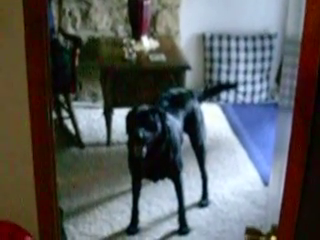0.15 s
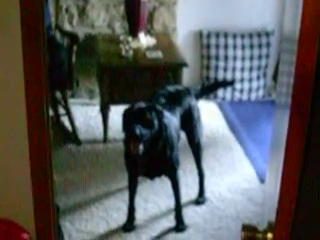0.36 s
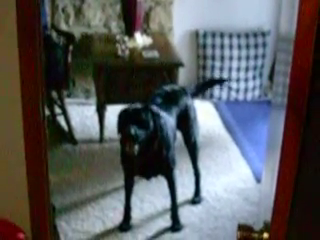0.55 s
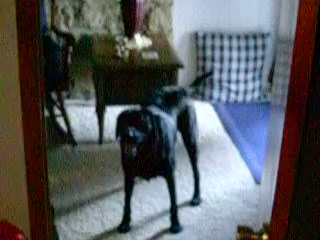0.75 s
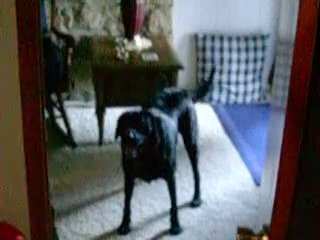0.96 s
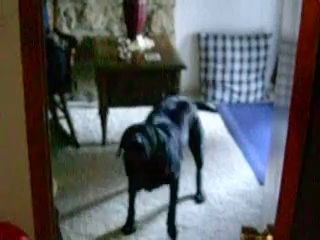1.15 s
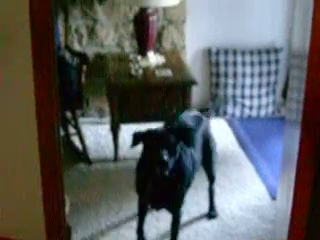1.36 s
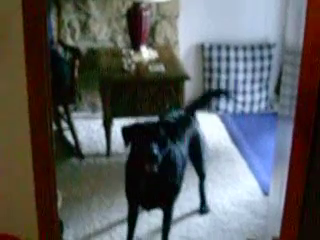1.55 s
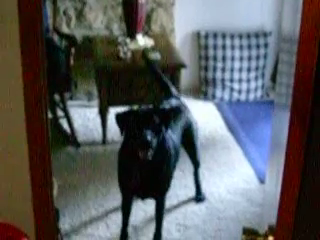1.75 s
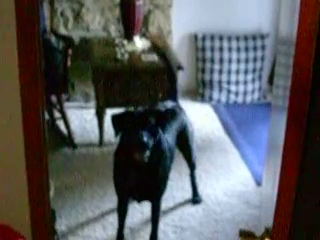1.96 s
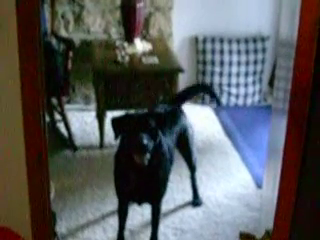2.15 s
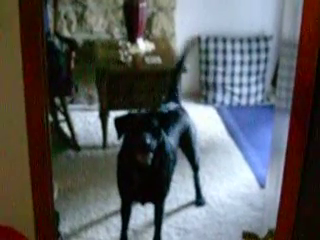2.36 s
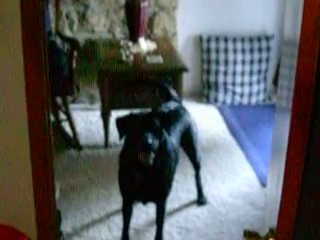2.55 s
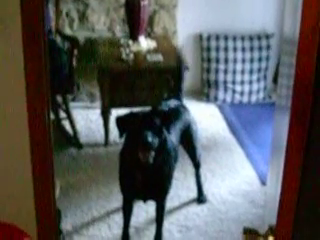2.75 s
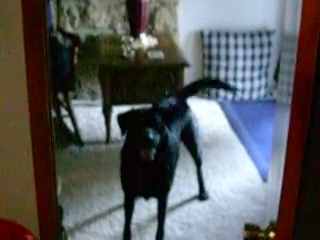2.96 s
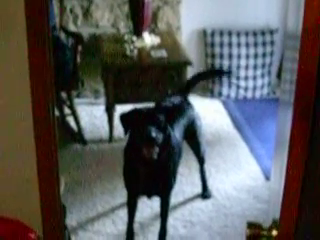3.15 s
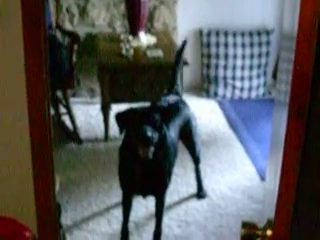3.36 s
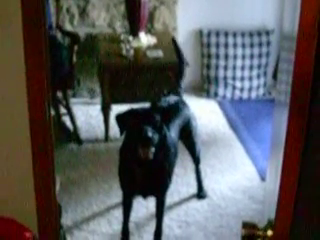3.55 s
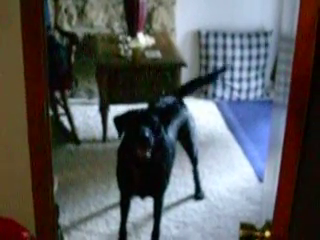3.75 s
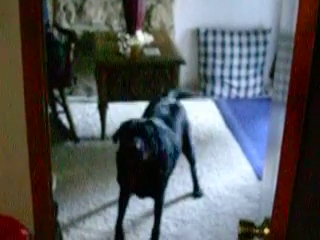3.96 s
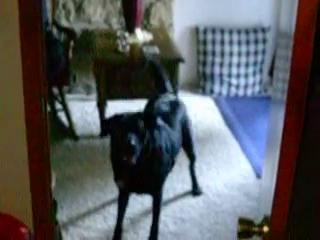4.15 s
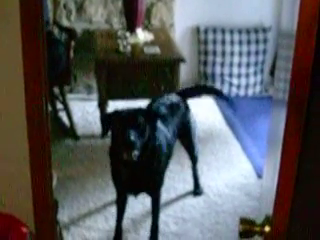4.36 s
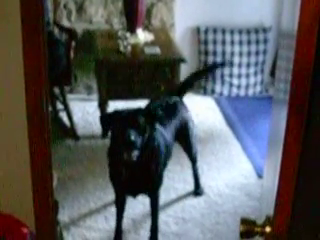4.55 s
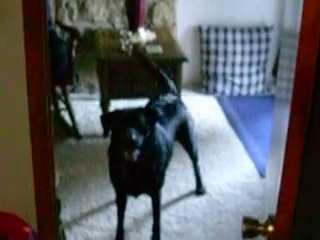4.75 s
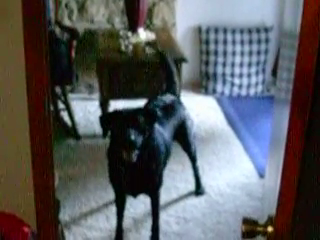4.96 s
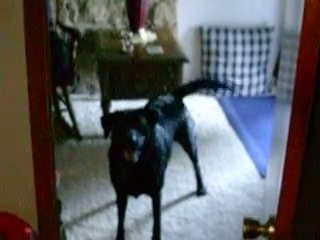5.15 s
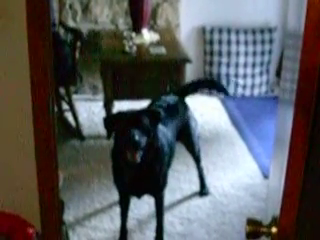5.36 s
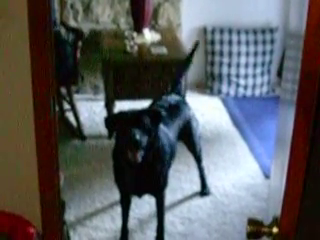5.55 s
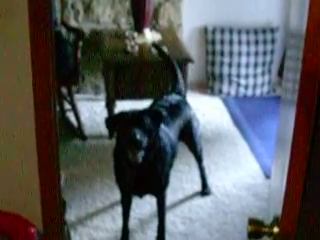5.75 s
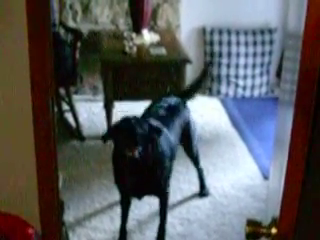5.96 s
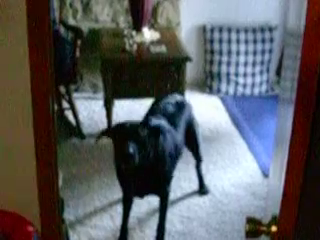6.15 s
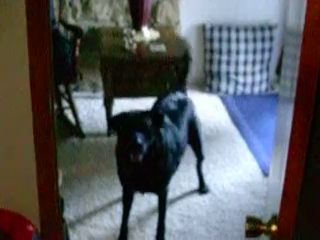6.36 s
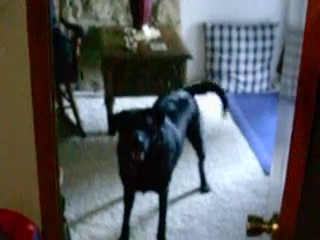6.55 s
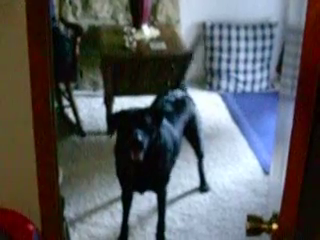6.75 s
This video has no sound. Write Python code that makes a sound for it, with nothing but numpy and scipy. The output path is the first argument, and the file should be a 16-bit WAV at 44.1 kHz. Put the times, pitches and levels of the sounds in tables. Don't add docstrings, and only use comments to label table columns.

```python
import sys
import numpy as np
from scipy import signal
from scipy.fft import rfft, irfft, next_fast_len
from scipy.io import wavfile
from scipy.ndimage import uniform_filter1d

SR = 44100
rng = np.random.default_rng(int(sys.argv[2]) if len(sys.argv) > 2 else 0)


def rack_gain(trim_db):
    fader = np.asarray(trim_db, float)
    return 10 ** (fader / 20)


def inscribe(sig):
    pcm = np.round(np.clip(np.atleast_2d(sig).T, -1, 1) * 32767)
    wavfile.write(sys.argv[1], SR, pcm.astype(np.int16))


N = 298865


def rms_one(x):
    return x / np.sqrt(np.mean(x ** 2) + 1e-20)


def drift(rate_hz, size):
    r = np.exp(-2 * np.pi * rate_hz / SR)
    wander = signal.lfilter([1], [1, -2 * r, r * r], rng.standard_normal(size + 4000))
    return rms_one(wander[4000:])


def resonance_filter(hz, width_hz):
    r = np.exp(-np.pi * width_hz / SR)
    return [(1 - r * r) / 2, 0, (r * r - 1) / 2], [1, -2 * r * np.cos(2 * np.pi * hz / SR), r * r]


def resonance(x, hz, width_hz):
    return signal.lfilter(*resonance_filter(hz, width_hz), x)


# (start [s], rise time [s], jaw starts closing after [s], level [dB], pitch sag [Hz/s])
BARK_TIMES = [
    (1.028, .024, .115, -4.5, 2000),
    (3.809, .013, .105, -4, 3036),
    (5.909, .013, .11, -3.5, 2906),
]


def barks():
    return sum(bark(*row) for row in BARK_TIMES)


BARK_S = .23
FUNDAMENTAL_DB = -17.5
JAW_DB = -6


def bark(start, *gesture, jitter=.028, uneven_db=6.0):
    first, size = int(start * SR), int(BARK_S * SR)
    pitch, level_db, hoarse, open_db, jaw_hz = bark_shape(np.arange(size) / SR, *gesture)
    hoarse = np.clip(hoarse, 0, 1)

    phase = 2 * np.pi * np.cumsum(pitch * (1 + jitter * drift(66.2, size))) / SR
    pulses = rms_one(sum(np.cos(k * phase) for k in range(1, 9)))
    pulses = pulses * rack_gain(uneven_db * hoarse * drift(130, size))
    breath = signal.lfilter([.4], [1, -.6], rng.standard_normal(size))
    rasp = rms_one(breath * (1 + 0.35 * np.cos(phase)))
    folds = np.sqrt(1 - hoarse) * pulses + np.sqrt(hoarse) * 2.0 * rasp

    voice = jaw(jaw(folds + 1.9 * rasp, jaw_hz * 1.03), jaw_hz * .97)
    voice *= rack_gain(JAW_DB + 6.0 * np.log2(jaw_hz / 650) + 3.5 * drift(50, size))
    voice = voice + rack_gain(FUNDAMENTAL_DB + 5.3 * drift(53, size)) * np.cos(phase)
    voice = voice + throat(folds, rasp, open_db)
    voice = signal.sosfilt(signal.butter(4, 270, "high", fs=SR, output="sos"), voice)
    voice /= np.sqrt(uniform_filter1d(voice ** 2, size=900) + 1e-9)

    out = np.zeros(N)
    out[first:first + size] = voice * rack_gain(level_db) * signal.windows.tukey(size, .05)
    return out


ONSET_DEPTH_DB, ONSET_CURVE, SWELL_DB_PER_S, SWELL_LAG_S = 29.5, 1.6, 69, .055
FADE_LAG_S, FADE_S, FADE_DB = .012, 0.077, 38
START_HZ, TOP_HZ, LOWEST_HZ = 344.25, 581.2, 347
GLIDE_LAG_S, GLIDE_RISES, GLIDE_S = .016, 1.2, .02
JAW_REST_HZ, JAW_DROP_HZ, JAW_DROP_S, JAW_OVER_PITCH = 579, 210, .045, 1.03
OPEN_DB, OPEN_DB_PER_OCTAVE = 0, 6.0
HOARSE_EDGE, HOARSE_PEAK, HOARSE_S = .2, .22, .05


def bark_shape(t, rise_s, close_s, level_db, sag_hz_per_s):
    spent = np.maximum(t - close_s - FADE_LAG_S, 0) / FADE_S
    onset = ONSET_DEPTH_DB * np.exp(-(t / rise_s) ** ONSET_CURVE)
    swell = SWELL_DB_PER_S * np.maximum(t - SWELL_LAG_S, 0)
    level = level_db - onset + swell - FADE_DB * spent ** 1.8

    tight = .5 + .5 * np.tanh((t - GLIDE_LAG_S - GLIDE_RISES * rise_s) / GLIDE_S)
    sagging = np.maximum(TOP_HZ - sag_hz_per_s * (t - close_s), LOWEST_HZ)
    pitch = np.minimum(START_HZ + (TOP_HZ - START_HZ) * tight, sagging)

    settling = JAW_REST_HZ + JAW_DROP_HZ * np.exp(-t / JAW_DROP_S)
    jaw_hz = np.minimum(settling, JAW_OVER_PITCH * sagging)
    open_db = OPEN_DB + OPEN_DB_PER_OCTAVE * np.log2(jaw_hz / TOP_HZ)
    hoarse = HOARSE_EDGE + HOARSE_PEAK * np.exp(-((t - close_s) / HOARSE_S) ** 2)
    return pitch, level, hoarse, open_db, jaw_hz


JAW_WIDTH_HZ = 150


def jaw(x, centre_hz, size=64):
    out, state = np.zeros(len(x)), np.zeros(2)
    for i in range(0, len(x), size):
        mouth = resonance_filter(centre_hz[i], JAW_WIDTH_HZ)
        out[i:i + size], state = signal.lfilter(*mouth, x[i:i + size], zi=state)
    return out


# (frequency [Hz], width [Hz], level [dB])
THROAT_RESONANCES = [(448, 91, -15.5), (800, 190, -4.5), (1045, 247, 0.5), (1440, 220, -6.5),
                     (1646, 250, -9), (2074.3, 120, -10.5), (2275, 87, -19), (3233, 220, -36.5)]


def throat(folds, rasp, open_db):
    voice = 0
    for k, (hz, width, top_db) in enumerate(THROAT_RESONANCES):
        tilt = rack_gain(open_db * np.log2(hz / 700))
        airy = 0.33 * (hz / 2000) ** 2 * rasp
        ring = resonance(resonance(folds + airy, hz, width * 1.86), hz, width * 1.86)
        voice = voice + (-1) ** k * rack_gain(top_db) * tilt * ring
    return voice


# (time [s], length [s], level [dB], centre [Hz])
BREATHS = [
    (1.018, 0.016, -36.5, 1173),
    (1.902, .12, -53, 1280),
    (3.703, .12, -50, 960),
    (4.414, .1, -51, 1105),
    (5.901, 0.022, -41, 942),
    (3.804, 0.013, -46, 1092),
    (6.296, 0.16, -57, 896.4),
]


def pants():
    t, out = np.arange(N) / SR, np.zeros(N)
    for s, length, level_db, hz in BREATHS:
        near = slice(int((s - 2 * length) * SR), int((s + 2 * length) * SR))
        air = rng.standard_normal(len(t[near]))
        air = resonance(air, hz, 340) + 0.5 * resonance(air, 1.7 * hz, 250)
        puff = np.exp(-(2 * (t[near] - s) / length) ** 2)
        out[near] += rack_gain(level_db) * rms_one(air) * puff
    return out


# (time [s], peak level [dB], ring [Hz], ring t60 [s], thump level [dB])
TICK_TIMES = [
    (1.572, -37.5, 3330, 0.0039, -28),
    (1.5814, -30, 987, 0.034, -17.5),
    (1.583, -27, 1616, .009, -43),
    (1.5817, -35, 2970, .007, -54.5),
    (1.736, -42.5, 2670, 0.023, -51),
    (1.7528, -22, 2930, 0.0095, -48),
    (1.756, -46, 2590, 0.1, -48),
    (2.501, -49.5, 2515, 0.023, -41),
    (2.98, -44.5, 2960, .015, -45),
]


def ticks():
    t, out = np.arange(4000) / SR, np.zeros(N)
    for s, peak_db, hz, t60, thump_db in TICK_TIMES:
        ring = np.sin(2 * np.pi * hz * t) + 0.41 * np.sin(2 * np.pi * hz * 1.1 * t)
        crack = 1.6 * resonance(rng.standard_normal(4000), 2700, 2800) * np.exp(-t / 0.0033)
        push = np.cos(2 * np.pi * 75 * t + 0.3) * np.exp(-t / 0.0034)
        tick = rack_gain(peak_db - 60 * t / t60) * (ring + crack) + rack_gain(thump_db) * push
        out[int(s * SR):int(s * SR) + 4000] += tick
    return out


ROOM_T60_S, ROOM_DB, WALL_CUT_HZ = 0.23, -8, 3500


def room(x):
    size = next_fast_len(N + SR)
    w = 2 * np.pi * np.fft.rfftfreq(size)
    hz = w * SR / (2 * np.pi)
    t60 = ROOM_T60_S / (1 + (hz / WALL_CUT_HZ) ** 2)
    echo = 0
    for k, lag in enumerate(rng.uniform(.013, .05, 32) * SR):
        loop = rack_gain(-60 * lag / SR / t60) * np.exp(-1j * w * lag)
        echo = echo + (-1) ** k * loop / (1 - loop)
    low_loss = (hz / 500) ** 2
    echo = echo * low_loss / (1 + low_loss)
    for lag in (61, 149, 317):
        z = np.exp(-1j * w * lag)
        echo = echo * (z - .6) / (1 - 0.39 * z)
    return irfft(rfft(x, size) * echo, size)[:N] / 5.5


RUMBLE_DB, RUMBLE_CUT_HZ = -38, 3000
# (frequency [Hz], level [dB])
RUMBLE_COLOUR = [(12, -44), (22, -3), (45, -7), (75, -4), (175, -15.5), (320, -24), (1090, -32),
                 (2500, -43.5)]
# (frequency [Hz], width [octaves], lift [dB])
MODES = [(95.6, .17, 7), (122.74, 0.21, 7), (218.3, .15, 8), (395.9, .08, 8.5), (640, 0.074, 3.5)]


def rumble():
    size = next_fast_len(N)
    hz = np.fft.rfftfreq(size, 1 / SR) + 1
    points_hz, points_db = np.transpose(RUMBLE_COLOUR)
    slope_db = np.interp(np.log(hz), np.log(points_hz), points_db)
    lift_db = sum(db * np.exp(-(np.log2(hz / mode_hz) / octaves) ** 2) for mode_hz, octaves, db in MODES)
    colour = rack_gain(slope_db + lift_db) / (1 + (hz / RUMBLE_CUT_HZ) ** 12)
    noise = irfft(rfft(rng.standard_normal(size)) * colour, size)[:N]
    return rack_gain(RUMBLE_DB) * rms_one(noise)


def scene():
    dog = barks() + pants()
    return (rack_gain(-2.5) * dog + rack_gain(ROOM_DB) * room(dog) + ticks() + rumble())[None]


HOLD_S, GRAB_S = 0.11, .014
# (time [s], drop [dB], recovery time [s])
GAIN_DROPS = [
    (1.088, 23, 0.18),
    (3.863, 23, 0.12),
    (5.961, 22, 0.099),
]


def gain_db():
    t, out = np.arange(N) / SR, np.zeros(N)
    for s, drop_db, recover_s in GAIN_DROPS:
        since = t - s
        down = 0.31 * np.clip(since / GRAB_S, 0, 1) + 0.4 * np.clip(since / HOLD_S, 0, 1)
        out -= drop_db * down * np.exp(-np.maximum(since - HOLD_S, 0) / recover_s)
    return out


def roll_off(x):
    return signal.sosfilt(signal.butter(12, 15740, fs=SR, output="sos"), x)


BAND_EDGE_HZ, CONVERTER_TOP, FILE_TOP = 5360, 0.7, .72
OFFSET, STEPS = -.0028, 128


def record(dry):
    slow = signal.resample_poly(dry * rack_gain(gain_db()), 80, 441, axis=1) + OFFSET
    slow = np.clip(slow, -CONVERTER_TOP, CONVERTER_TOP)
    slow = np.round(slow * STEPS / FILE_TOP) * FILE_TOP / STEPS
    x = signal.resample_poly(np.pad(slow, ((0, 0), (0, 40)), "edge"), 441, 80, axis=1)
    x = signal.sosfiltfilt(signal.cheby2(8, 35, BAND_EDGE_HZ, fs=SR, output="sos"), x)[:, :N]
    fade_out = np.minimum(np.arange(N, 0, -1) / 150, 1)
    mix = np.clip(x, -FILE_TOP, FILE_TOP) * fade_out
    return roll_off(mix)


dry = scene()
out = record(dry)
inscribe(out)
```